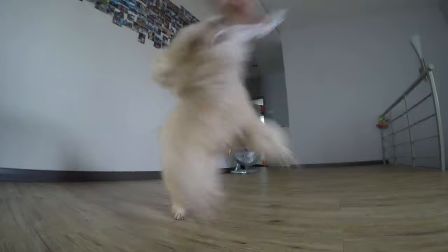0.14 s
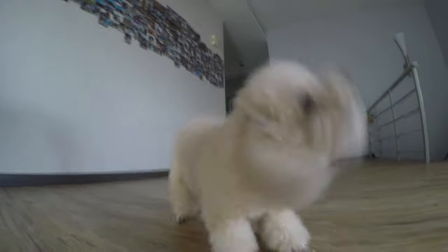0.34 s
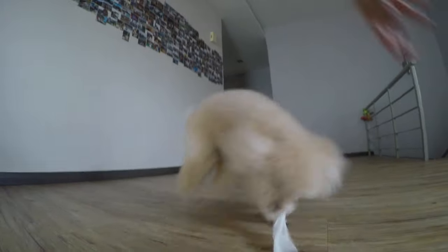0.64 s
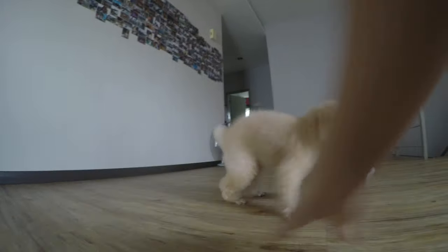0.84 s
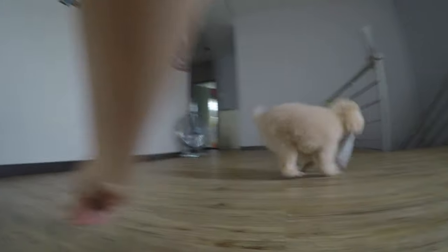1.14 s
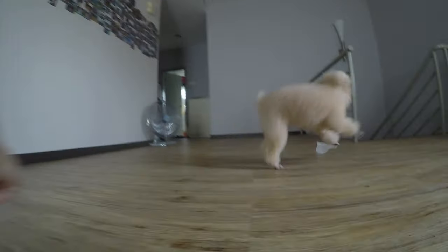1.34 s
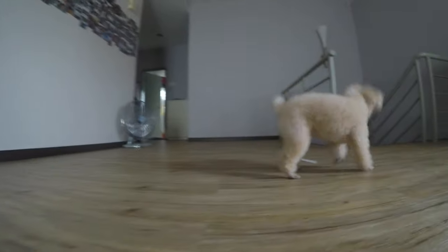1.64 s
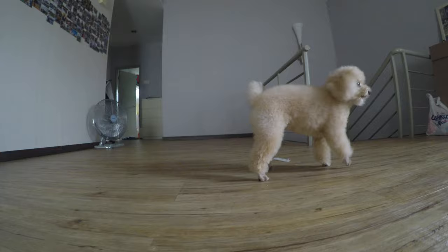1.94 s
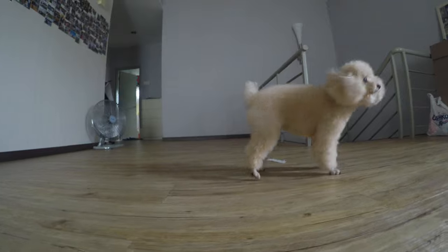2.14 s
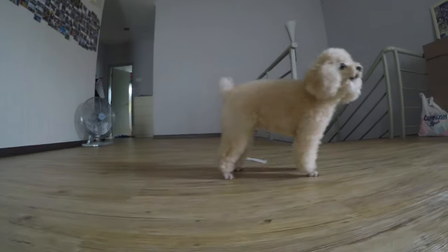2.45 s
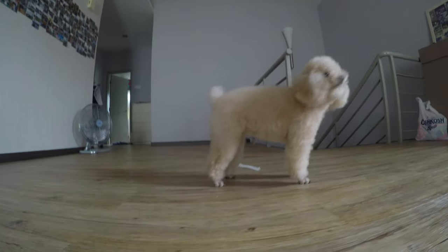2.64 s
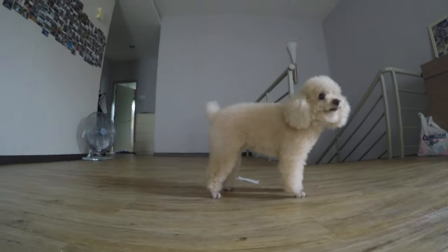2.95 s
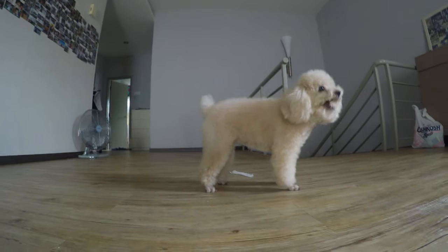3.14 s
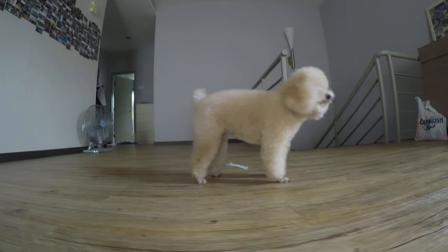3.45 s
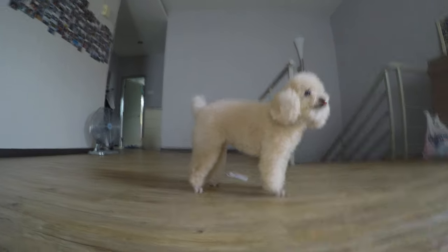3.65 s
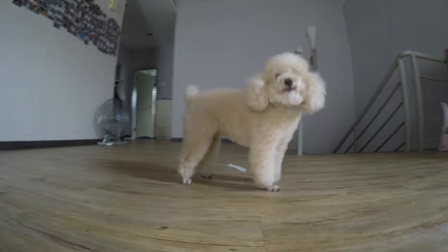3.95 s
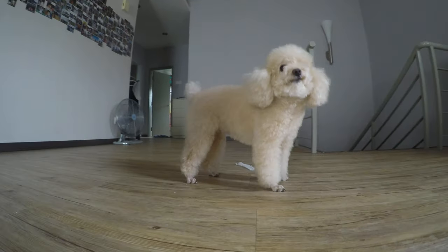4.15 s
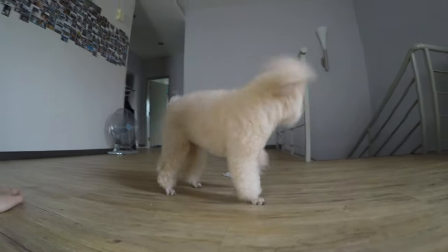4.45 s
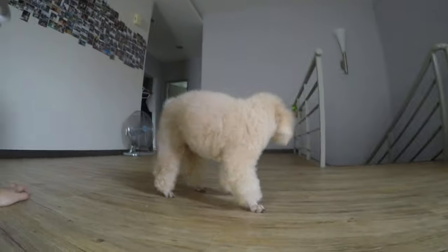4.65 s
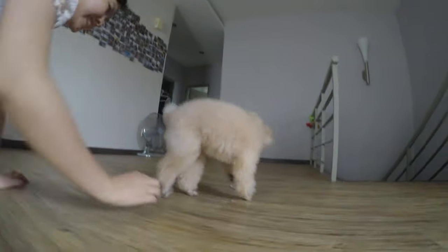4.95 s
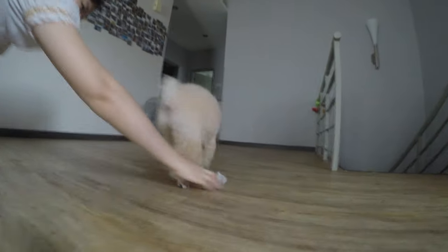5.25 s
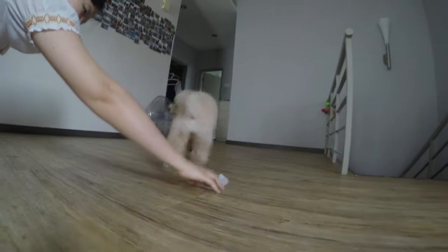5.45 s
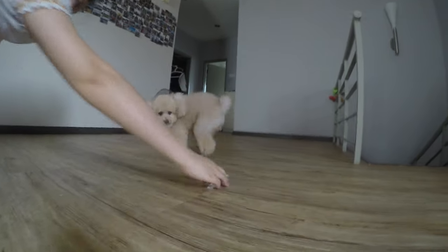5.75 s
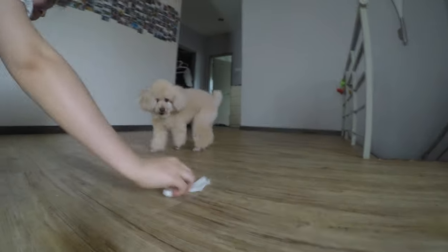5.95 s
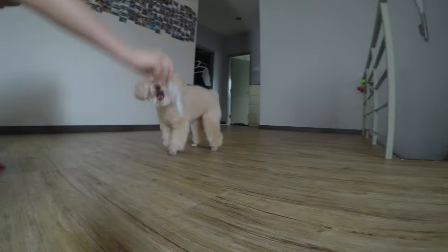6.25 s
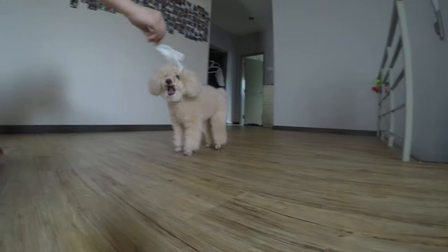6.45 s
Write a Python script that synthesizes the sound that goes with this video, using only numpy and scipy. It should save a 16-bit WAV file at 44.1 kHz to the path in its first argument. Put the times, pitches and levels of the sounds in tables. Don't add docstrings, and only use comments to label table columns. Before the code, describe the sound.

Very close to a small microphone in a quiet room, a small dog gives two short soft grunts amid paw thuds, then nearly falls silent. Long throaty growls follow, rattling and breathy, sometimes smoothing into a low hum, with brief gaps. The strongest come past the middle, then they weaken into small grunts. Paws and claws tap the wooden boards.

```python
import sys
import numpy as np
from scipy import signal
from scipy.fft import rfft, irfft, next_fast_len
from scipy.io import wavfile
from scipy.ndimage import uniform_filter1d, map_coordinates

SR = 44100
rng = np.random.default_rng(int(sys.argv[2]) if len(sys.argv) > 2 else 0)


def convert_level_to_amplitude(level_db):
    exponent = np.asarray(level_db, float) / 20
    return 10 ** exponent


def log_audio(samples):
    frames = np.atleast_2d(samples).T
    limited = np.clip(frames, -1, 1)
    pcm = np.round(limited * 32767).astype(np.int16)
    wavfile.write(sys.argv[1], SR, pcm)


N = 291573

# frequency_hz, level_db
ROOM_SPECTRUM = [(15, -58), (25, 8.5), (154, 3), (1060, -28.5), (2180, -23), (4750, -36), (7280, -39),
                 (13500, -41), (15000, -61)]
# time_s, gain_db
ROOM_GATE = [(0, 1.5), (.285, -15), (.32, 2), (.36, -10), (.4, 3.5), (.58, -8.5), (.62, -3), (2.97, 6),
             (3.1, 4.5)]
# centre_s, length_s, level_db, centre_hz, width_hz
SCUFFS = [(.17, .17, -60, 4500, 350), (.33, .03, -50, 1400, 600), (.95, .3, -43, 280, 120),
          (.16, .16, -47, 1300, 500), (.46, .1, -48, 2050, 350), (.648, .012, -60, 6000, 3000),
          (.737, .02, -57, 7500, 4000), (.805, .02, -62, 2900, 500), (.832, .014, -54, 1650, 250),
          (.853, .014, -50, 1650, 250), (.832, .016, -61, 4000, 500), (.853, .012, -60, 4100, 500),
          (.84, .04, -63, 6500, 2500), (2.826, .025, -30, 2750, 300), (2.83, .02, -36, 2200, 200),
          (2.2, .025, -31, 1850, 200), (.12, .05, -42, 450, 150), (2.83, .04, -41, 6800, 1500),
          (6.195, .005, -45, 4000, 2200), (.942, .03, -48, 5000, 6000), (.349, .01, -60, 12500, 4000),
          (.648, .008, -64, 11000, 4000), (.737, .018, -60, 12000, 4500), (.97, .16, -60, 12000, 5000)]
# start_s, thud_db, click_db, thud_t60_s
PAW_TAPS = [(0.216, -21, -46, 0.022), (0.333, -12.5, -40, 0.022), (0.468, -0.5, -31, 0.026),
            (0.505, -12.5, -42, 0.044), (0.808, -24, -25, 0.045), (0.927, -23, -8.5, 0.049),
            (1.156, -12, -18, 0.041), (1.256, -31, 6, 0.037), (1.285, -4.5, -19.5, 0.051),
            (1.948, -5.5, -15.5, 0.052), (4.728, -20, -13, 0.038), (5.357, -24, 7, 0.05),
            (6.02, -2.5, -17.5, 0.036), (6.046, -10.5, -22, 0.04), (6.446, -22, -7, 0.029)]
# start_s, level_db
CLAW_TICKS = [(0.5992, -34), (0.618, -34.5), (0.639, -30.5), (0.665, -32)]
# start_s, peak_db
CRACKLE = [(3.9494, -61), (4.3779, -58), (4.4917, -51), (4.593, -51), (5.3852, -59)]
# time_s, centre_hz, level_db
JAW_GAPE = [(6.43, 328, -57), (6.46, 479.4, -32.5), (6.49, 735, -31), (6.53, 931, -34.5), (6.55, 407, -53),
            (6.58, 630.4, -29), (6.61, 900, -35)]

# time_s, breath_db, voicing_db
GRUNTS = [
    [(0, -55.5, -21), (.04, -62, -27.5), (.078, -64.5, -25.5), (.09, -46.5, -25.5), (.13, -40, -27),
     (.16, -46, -15.5), (.225, -41.5, -18.5), (.275, -60, -37)],
    [(.29, -69.5, -39.5), (.312, -46, -38), (.338, -45, -27.5), (.35, -80, -46), (.372, -60.5, -50),
     (.42, -52.5, -35), (.5, -48.5, -24), (.56, -74.5, -58)],
]
PAUSE = [
    [(.62, -86, -68), (.88, -62, -66)],
]
GROWLS = [
    [(.9, -75.5, -61), (.93, -41.5, -45.5), (1.03, -50.5, -42), (1.27, -38.5, -23), (1.31, -33, -17),
     (1.57, -27, -16.5), (1.62, -23, -8.5), (1.88, -33, -12), (2.09, -40.5, -29)],
    [(2.19, -35.5, -28), (2.2, -30, -30), (2.23, -34, -24.5), (2.5, -29.5, -8.5), (2.6, -37, -13),
     (2.76, -33, -6), (2.84, -33, -6), (2.93, -41, -16), (2.975, -62.5, -47.5)],
    [(3.12, -57, -54), (3.18, -40, -24.5), (3.42, -26.5, -18), (3.66, -28, -11), (3.74, -26, -9.5),
     (3.93, -23.5, -8), (4.07, -22.5, -11), (4.2, -29, -16), (4.325, -36, -23.5)],
]
LATE_GROWLS = [
    [(4.33, -30, -21), (4.356, -26, -25.5), (4.456, -25, -7.5), (4.488, -23, -14.5), (4.61, -24, -5),
     (4.63, -27.5, -4.5), (4.66, -25.5, -12.5), (4.9, -31.5, -13)],
    [(4.9, -30, -14), (5.062, -23.5, -13.5), (5.18, -24, -9.5), (5.236, -24.5, -21), (5.382, -28.5, -8.5),
     (5.468, -31, -11), (5.54, -34, -7.5), (5.7, -37.5, -19)],
    [(5.7, -39.5, -22), (5.746, -34.5, -17.5), (5.804, -36.5, -28), (5.842, -36.5, -21),
     (5.952, -30.5, -21), (5.992, -39.5, -24.5), (6.038, -35, -15), (6.16, -41, -26)],
]
LAST_GRUNTS = [
    [(6.175, -50.5, -34.5), (6.25, -44, -26), (6.265, -55, -37.5), (6.36, -55, -37.5)],
    [(6.372, -43, -25), (6.42, -48, -26.5), (6.5, -39.5, -23), (6.61, -41, -24)],
]
# time_s, flap_hz, chest_hz, slackness_db, throat_open_db
FOLDS = [(.8, 72, 195, -38.5, -2), (1.05, 66.57, 174, -17, 14.5), (1.3, 67.93, 185, -16, -8.5),
         (1.6, 68.7, 198, -20.5, -2), (1.85, 70.3, 214, -11.5, 10.5), (2.1, 65.6, 165, -19, 2.5),
         (2.6, 59.53, 179.5, -24, 2.5), (2.85, 61.07, 187.6, -40, 10.5), (3.3, 61.85, 176.5, -33.5, 2),
         (4.4, 62, 183.7, -24.5, 1.5), (4.52, 62.05, 198.6, -16.5, -15), (5.0, 65.9, 163.5, -14.5, -15.5),
         (5.18, 74.97, 147.3, -26.5, -18), (5.24, 109.9, 218, -16, 8), (5.27, 92.4, 225, -17.5, 9.5),
         (5.3, 132.5, 256, -6.5, 6.5), (5.335, 107.9, 225, -19, 8.5), (5.38, 108.2, 217, -11.5, 9),
         (5.42, 86.1, 193, -13, 6.5), (5.55, 72.2, 198, -27.5, 3), (6.1, 64.13, 208, -22, 5.5),
         (6.61, 57.04, 220, -15, 8.5)]
# time_s, hum_hz
HUM = [
    [(.2, 169.7), (1.5, 191.4), (1.95, 194.6)],
    [(2.2, 164.3), (2.276, 166), (2.458, 174.3), (2.91, 174), (2.948, 162.3), (2.98, 161.4)],
    [(3.4, 158.3), (3.48, 169.9), (3.508, 166.6), (3.766, 181.2), (3.988, 170.1), (4.07, 182), (4.25, 173)],
    [(4.38, 197.8), (4.416, 178.8), (4.592, 182.5), (4.7, 190.8)],
    [(5.33, 224), (5.375, 226), (5.42, 199.6), (5.47, 195.7), (5.54, 213.1), (5.6, 205.3)],
]
# start_s, length_s, swell_s, uneven_share (0-1)
LOCKS = [(0, .1, .01, .45), (.12, .06, .02, .15), (1.5, .4, .12, .6), (2.22, .71, .5, .012),
         (3.35, .39, .35, .1), (3.78, .32, .05, .16), (4.12, .1, .02, .5), (4.3, .19, .12, .25),
         (4.51, .14, .06, .07), (4.72, .12, .02, .55), (5.345, .075, .015, .22), (5.47, .09, .06, .15)]
# time_s, evenness (0-1)
EVENNESS = [(1.55, 0), (1.68, .5), (1.85, .5), (1.9, 0), (5.2, 0), (5.24, .6), (5.41, .6), (5.45, 0)]
# centre_s, half_length_s, depth_db
CATCHES = [(0.059, 0.013, -16), (0.197, 0.034, -14), (0.364, 0.015, -25), (0.444, 0.02, -9.5),
           (0.49, 0.017, -31.5), (0.517, 0.027, -27), (0.994, 0.035, -15.5), (1.15, 0.023, -23.5),
           (1.177, 0.02, -15), (1.291, 0.023, -11.5), (1.3, 0.012, -6.5), (1.556, 0.0073, -21.5),
           (1.703, 0.0054, -8), (1.761, 0.005, -12), (1.908, 0.012, -13.5), (1.985, 0.029, -12),
           (2.085, 0.013, -17), (2.259, 0.0097, -4.5), (3.359, 0.0055, -15.5), (3.407, 0.011, -9),
           (3.77, 0.012, -20), (3.805, 0.019, -13.5), (3.946, 0.02, -18), (3.983, 0.013, -21),
           (4.049, 0.018, -19.5), (4.725, 0.0055, -14), (4.794, 0.0072, -5), (5.027, .01, -8),
           (5.235, 0.0099, -14), (5.342, 0.012, -16), (5.428, 0.01, -10.5), (5.673, 0.0079, -20.5),
           (5.712, 0.011, -20), (5.802, 0.0077, -12), (5.913, 0.0097, -12.5), (6.018, 0.037, -18.5),
           (6.094, 0.019, -25.5), (6.421, 0.012, -17.5)]
# start_s, peak_db
HARD_PUFFS = [(0.082, -35.5), (1.282, -16), (1.31, -18.5), (1.355, -15.5), (1.379, -8.5), (1.495, -20),
              (1.558, -10), (1.647, -12), (1.688, -4.5), (1.706, -11), (1.766, -7), (1.779, -10.5),
              (1.826, -10.5), (1.922, -16), (1.948, -16), (2.007, -21), (2.194, -11.5), (3.369, -16),
              (3.404, -15), (3.479, -11), (3.519, -13.5), (3.597, -15.5), (3.675, -12.5), (3.73, -14),
              (3.756, -9), (3.81, -11), (3.858, -6.5), (3.91, -9.5), (3.947, -6), (3.979, -6.5),
              (4.131, -7.5), (4.162, -12), (4.342, -10), (4.375, -17.5), (4.49, -10), (4.521, -14),
              (4.558, -3.5), (4.651, -4), (4.673, -8.5), (4.731, -8), (4.763, -15.5), (4.801, -13),
              (4.95, -10), (4.969, -11), (5.023, -6.5), (5.114, -9), (5.155, -9.5), (5.175, -7.5),
              (5.197, -7), (5.248, -4), (5.295, -6.5), (5.352, -10), (5.373, -11.5), (5.425, -8),
              (5.505, -14), (5.535, -11), (5.587, -19), (5.615, -24.5), (5.675, -19.5)]
# start_s, peak_db
RATTLE = [(1.666, -8.5), (1.714, -12.5), (1.721, -9), (1.728, -6), (1.736, -10), (1.804, -11.5),
          (1.813, -8.5), (1.827, -12), (1.839, -12.5), (1.878, -10.5), (5.038, -9.5), (5.05, -13)]
# time_s, hiss_db
LIPS = [(0, -5.5), (.55, 0), (.9, 6), (1.3, -3.5), (1.65, -0.5), (1.95, -3), (2.3, 3), (2.8, 2), (3.25, -4),
        (3.8, 2), (4.3, -3.5), (5.2, 5), (5.45, -5.5), (5.6, -30), (5.82, -22), (5.93, -0.5), (6.1, -4.5),
        (6.61, 0)]
# centre_hz, width_hz, level_db
JAW = [
    (653, 170, 9),
    (900, 335, 15),
    (1233, 894, 7.5),
]
THROAT = [
    (1794, 223, 21),
    (2538, 165, -10),
]
PALATE = [
    (2750, 480, -4),
    (3260, 296, 3.5),
    (3550, 350, 0),
]
TEETH = [
    (4750, 200, 6.5),
    (6660, 760, -2),
    (7600, 230, -3.5),
    (8160, 110, -2),
    (8680, 1700, -8.5),
]
# centre_hz, width_hz, level_db
PASSBANDS = [
    (900, 1210, 0),
    (1964, 1420, 0),
    (2940, 1800, 0),
    (5900, 5000, 0),
]

# centre_hz, width_hz, level_db
PORTS = [
    (165, 43, 0.5),
    (900, 550, 9),
    (2450, 900, 2.5),
    (6000, 5000, -4),
]
# time_s, side_db
PORT_DIFFERENCE = [(0, 7), (.5, -0.5), (.68, -22), (.72, -70), (.95, -52), (1.02, -20.5), (1.74, -46),
                   (1.78, -46)]
# time_s, level_db
PORT_HISS = [(0, -81.5), (.9, -81), (1.7, -82.5), (2.3, -91.5), (6.61, -99.5)]


def unit(x):
    return x / np.sqrt(np.mean(x ** 2) + 1e-20)


def steady(x, seconds):
    power = np.abs(uniform_filter1d(x ** 2, int(seconds * SR)))
    return x / np.sqrt(power + 1e-12)


def curves(rows):
    s, *cols = np.transpose(rows)
    return [np.interp(np.arange(N) / SR, s, c) for c in cols]


def wobble(rate):
    knots = rng.standard_normal(int(N * rate / SR) + 4)
    return map_coordinates(knots, [np.arange(N) * rate / SR])


def filtered(x, response):
    m = next_fast_len(N + SR // 2)
    return irfft(rfft(x, m) * response(np.fft.rfftfreq(m, 1 / SR)), m)[..., :N]


def modes(table):
    def response(f):
        total = 0
        for k, (centre, width, db) in enumerate(table):
            damping = 1j * f * width
            total = total + (-1) ** k * convert_level_to_amplitude(db) * damping / (centre ** 2 - f ** 2 + damping)
        return total
    return response


def ringing(x, hz, width_hz):
    turn = np.exp(2j * np.pi * np.cumsum(hz) / SR)
    keep = np.exp(-np.pi * width_hz / SR)
    return (signal.lfilter([1], np.convolve([1, -keep], [1, -keep]), x / turn) * turn).real


def room_tone():
    hz, db = np.transpose(ROOM_SPECTRUM)
    noise = filtered(rng.standard_normal(N), lambda f: convert_level_to_amplitude(np.interp(np.log(f + 1), np.log(hz + 1), db)))
    return convert_level_to_amplitude(-41.5 + curves(ROOM_GATE)[0]) * unit(noise)


def scuffs():
    out, t = np.zeros(N), np.arange(N) / SR
    for s, span, db, hz, width in SCUFFS:
        brush = filtered(rng.standard_normal(N), lambda f: modes([(hz, width, 0)])(f) ** 2)
        out += convert_level_to_amplitude(db) * np.exp(-(2 * (t - s) / span) ** 4) * unit(brush)
    return out


def crackle():
    out = np.zeros(N)
    decay_db = -60 * np.arange(200) / SR / .004
    for s, db in CRACKLE:
        out[round(s * SR):][:200] = convert_level_to_amplitude(db + 17 + decay_db) * rng.standard_normal(200)
    return filtered(out, modes([(12500, 5000, 0.0056)]))


def claws():
    out, t = np.zeros(N), np.arange(SR // 50) / SR
    attack = 1 - np.exp(-t / .00015)
    tick = np.sin(2 * np.pi * 230 * t + .6) * convert_level_to_amplitude(-60 * t / .022) * attack
    for s, db in CLAW_TICKS:
        out[round(s * SR):][:len(t)] += convert_level_to_amplitude(db + 7) * tick
    return out


def taps():
    out, t = np.zeros(N + SR), np.arange(SR // 8) / SR
    pad_press = 1 - np.exp(-t / 0.0046)
    for s, db, click_db, t60 in PAW_TAPS:
        thud = np.sin(2 * np.pi * 190 * t) * pad_press * convert_level_to_amplitude(6.0 - 60 * t / t60)
        click = rng.standard_normal(len(t)) + 2.5 * np.sin(2 * np.pi * 800 * t)
        click = signal.lfilter([.09], [1, -1.4, .49], click * convert_level_to_amplitude(click_db - 60 * t / .014))
        out[round(s * SR):][:len(t)] += convert_level_to_amplitude(db) * (thud + click)
    return out[:N]


def gape():
    hz, db = curves(JAW_GAPE)
    started = np.arange(N) > JAW_GAPE[0][0] * SR
    return convert_level_to_amplitude(db) * started * steady(ringing(rng.standard_normal(N), hz, width_hz=360), 0.014)


def roughness():
    t, unlock_s = np.arange(N) / SR, .05
    log_share = np.zeros(N)
    for s, span, swell, left in LOCKS:
        log_share += np.log(left) * np.interp(t - s, [0, swell, span, span + unlock_s], [0, 1, 1, 0])
    return np.exp(log_share)


def catches(rough):
    slips_a_second, slip_db, half_s = 9, -9, 0.013
    dips, luck = np.zeros(N), rng.random((60, 2))
    at = ((np.arange(60) + luck[:, 0]) / slips_a_second * SR).astype(int).clip(0, N - 1)
    dips[at] = slip_db * (.5 + luck[:, 1]) * rough[at]
    dips = np.convolve(dips, np.hanning(round(2 * half_s * SR)), "same")
    for s, span, db in CATCHES:
        length = round(2 * span * SR)
        dips[round((s - span) * SR):][:length] += db * np.hanning(length)
    return dips


def pulses(rate_hz, jitter, scatter_db):
    turns = np.cumsum(rate_hz * np.exp(jitter * wobble(40))) / SR
    return np.diff(np.floor(turns), prepend=0) * convert_level_to_amplitude(scatter_db * np.tanh(wobble(70)))


def locked_hum(chest_db, rough):
    hum_hz = curves(sum(HUM, []))[0] * (1 + 0.015 * rough * wobble(30))
    cycle = 2 * np.pi * np.cumsum(hum_hz) / SR
    strain = convert_level_to_amplitude(2.1 * (chest_db + 11))
    overtones = convert_level_to_amplitude(-33.5) * np.cos(2 * cycle) + convert_level_to_amplitude(-44.5) * np.sin(4 * cycle)
    hum = np.sqrt(2) * (np.sin(cycle) + strain * overtones)
    return hum * convert_level_to_amplitude((0.5 + 4.1 * rough) * np.tanh(wobble(28)))


def chest_voice(flaps, uneven, rough, catch_db, rasp_db, chest_db):
    flap_hz, chest_hz, slack_db, open_db = curves(FOLDS)
    rumble_db = slack_db + 0.46 * (rasp_db + 28.0) + 3.5 * wobble(9)
    upper_db = -17 - 0.24 * (chest_db + 17.5) + open_db
    stir = flaps + 1.5 * uneven * rng.standard_normal(N)
    rough_chest = steady(ringing(stir, chest_hz, width_hz=94.5), 0.051)
    chest = np.sqrt(rough) * rough_chest + np.sqrt(1 - rough) * locked_hum(chest_db, rough)
    upper = unit(filtered(stir, lambda f: modes([(300, 180, 0)])(f) / (1 + 1j * f / 700)))
    upper = np.sqrt(rough) * upper
    low = ringing(flaps + 2.3 * uneven * rng.standard_normal(N), flap_hz, width_hz=57.4)
    rumble = steady(filtered(low, lambda f: 1j * f / (25 + 1j * f)), 0.11)
    body = convert_level_to_amplitude(catch_db) * chest + convert_level_to_amplitude(upper_db + 0.069 * catch_db) * upper
    return convert_level_to_amplitude(chest_db) * body + convert_level_to_amplitude(rumble_db) * rumble


def throat_air(voice, flaps, uneven, rough, catch_db, rasp_db):
    swing = steady(np.gradient(filtered(voice, lambda f: 1 / (1 + (f / 260) ** 4))), 0.031)
    flow = 1.0 + 0.37 * np.maximum(swing, 0)
    puff_decay_s = 0.0023
    flow += 0.18 * rough * unit(signal.lfilter([1], [1, -np.exp(-1 / (puff_decay_s * SR))], flaps))
    flow = steady(flow * convert_level_to_amplitude(1.18 * wobble(200) + 1.9 * wobble(21)), 0.035)
    knocks = (.1 * rough + .4 * (1 - uneven)) * flaps
    puff = np.exp(-np.arange(600) / (0.0032 * SR))
    for s, db in HARD_PUFFS + RATTLE:
        at = round(s * SR)
        over_db = db - rasp_db[at]
        knocks[round((s + .001) * SR)] += convert_level_to_amplitude(over_db + 8)
        flow[round((s - .006) * SR):at] *= convert_level_to_amplitude(-4.5)
        flow[at:][:600] += convert_level_to_amplitude(over_db - 23.5) * puff
    noise = rng.standard_normal(N) + 0.68 * rng.standard_normal((4, N))
    knock_gains = convert_level_to_amplitude([[1.5], [0.2], [-8], [-12]])
    return flow * convert_level_to_amplitude(0.069 * catch_db) * noise + knocks * knock_gains


def mouth(air, rasp_db):
    open_db = curves(FOLDS)[3]
    hiss_db = -18 - 0.032 * (rasp_db + 26.0) + curves(LIPS)[0]
    jaw_db = 1.27 + 0.5 * wobble(7.7) + 0.14 * open_db
    parts = []
    for part_air, table, band in zip(air, (JAW, THROAT, PALATE, TEETH), PASSBANDS):
        part = unit(filtered(part_air, lambda f: modes(table)(f) * modes([band])(f)))
        parts.append(convert_level_to_amplitude(1.5 * wobble(14)) * part)
    jaw, throat, palate, teeth = parts
    return convert_level_to_amplitude(rasp_db) * (throat + convert_level_to_amplitude(jaw_db) * jaw + convert_level_to_amplitude(6.5 + 0.82 * hiss_db) * palate + convert_level_to_amplitude(hiss_db) * teeth)


def dog():
    rasp_db, chest_db = curves(np.concatenate(GRUNTS + PAUSE + GROWLS + LATE_GROWLS + LAST_GRUNTS))
    rough = roughness()
    catch_db = catches(rough)
    uneven = 1 - curves(EVENNESS)[0]
    flaps = unit(pulses(rate_hz=curves(FOLDS)[0], jitter=.2 * uneven, scatter_db=5.0 * uneven))
    voice = chest_voice(flaps, uneven, rough, catch_db, rasp_db, chest_db)
    air = throat_air(voice, flaps, uneven, rough, catch_db, rasp_db)
    return voice + mouth(air, rasp_db)


def scene():
    mid = room_tone() + scuffs() + crackle() + claws() + taps() + gape() + dog()
    delay_s = .0007
    side = filtered(mid, lambda f: modes(PORTS)(f) * np.exp(-2j * np.pi * f * delay_s))
    side = convert_level_to_amplitude(curves(PORT_DIFFERENCE)[0]) * side
    return np.array([mid + side, mid - side])


def low_pass(x):
    return signal.sosfilt(signal.butter(12, 15210, fs=SR, output="sos"), x)


def record(dry):
    x = filtered(dry, lambda f: 1j * f / (12 + 1j * f) / (1 + (f / 10800) ** 8))
    hiss = filtered(rng.standard_normal((2, N)), lambda f: (f / 14000) ** 2)
    x = x + convert_level_to_amplitude(curves(PORT_HISS)[0]) * hiss
    x = x / (1 + np.abs(x / .95) ** 6) ** (1 / 6)
    return low_pass(x)


dry = scene()
out = record(dry)
log_audio(out)
```